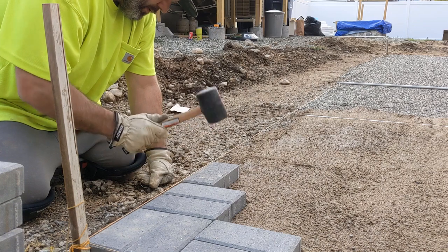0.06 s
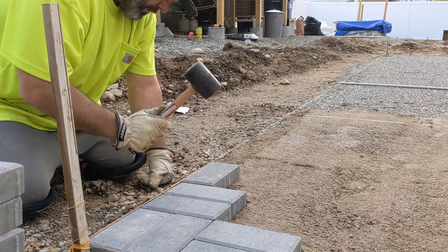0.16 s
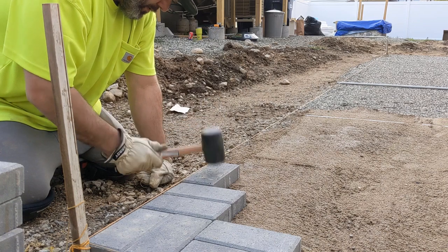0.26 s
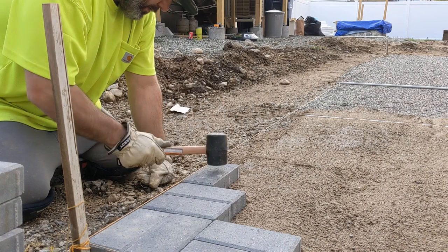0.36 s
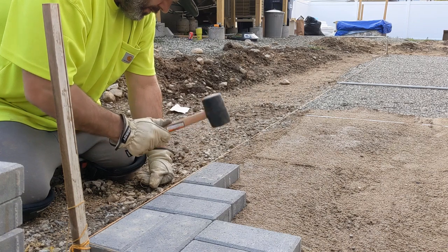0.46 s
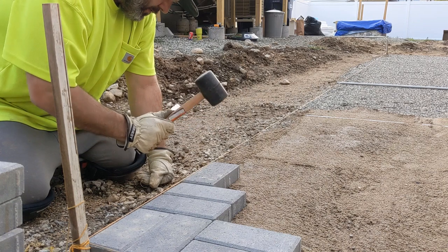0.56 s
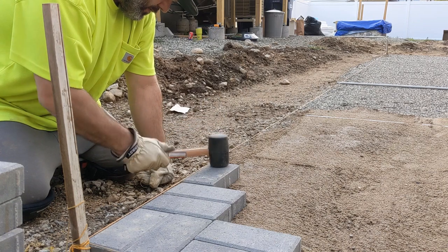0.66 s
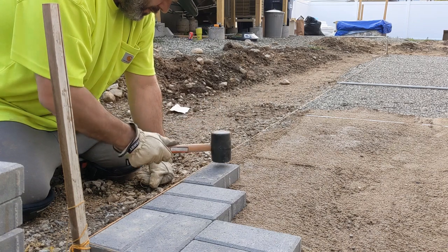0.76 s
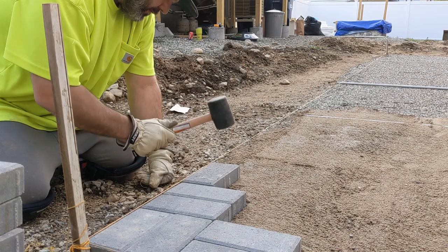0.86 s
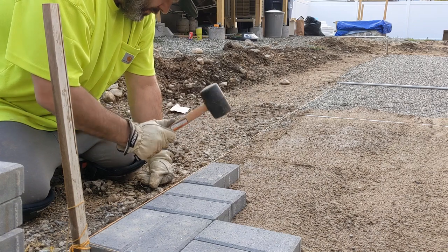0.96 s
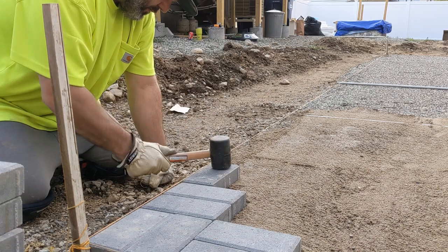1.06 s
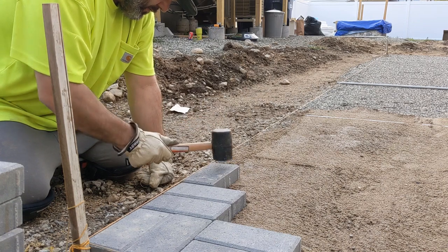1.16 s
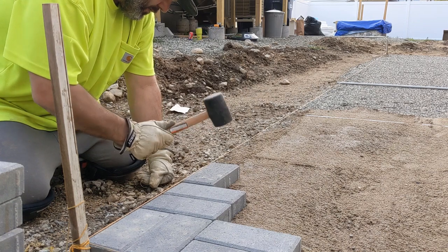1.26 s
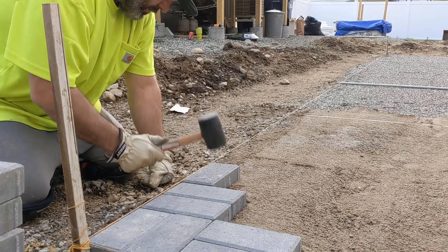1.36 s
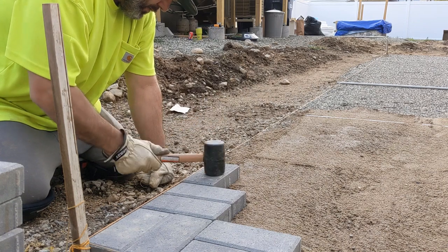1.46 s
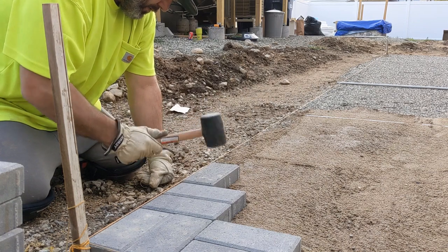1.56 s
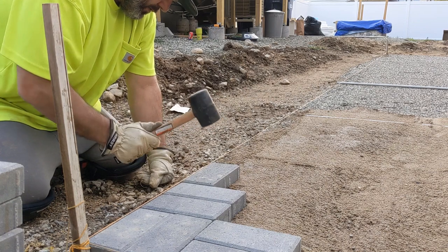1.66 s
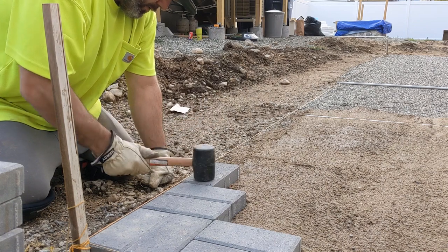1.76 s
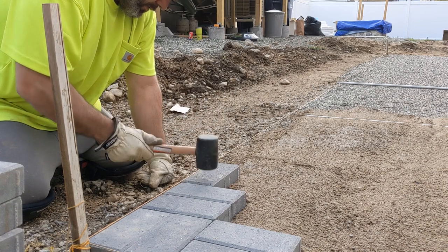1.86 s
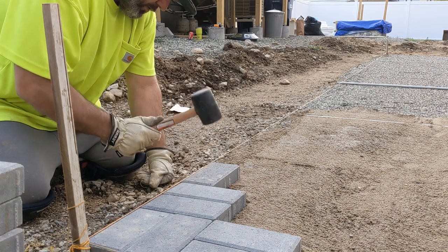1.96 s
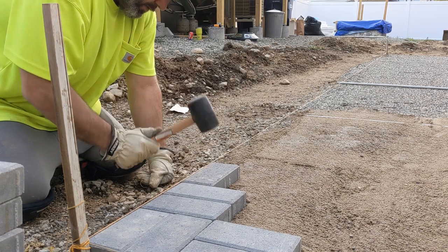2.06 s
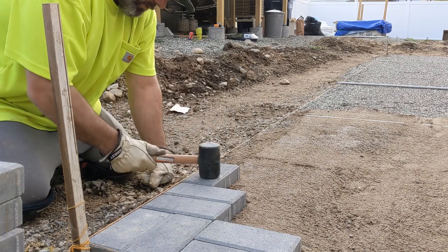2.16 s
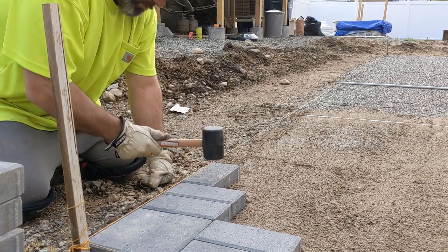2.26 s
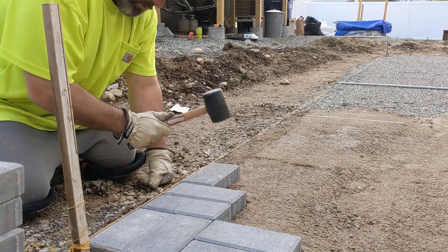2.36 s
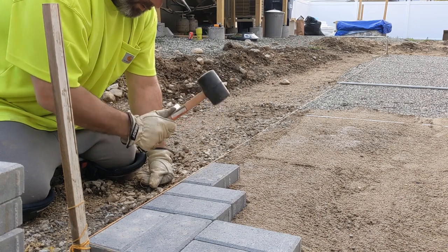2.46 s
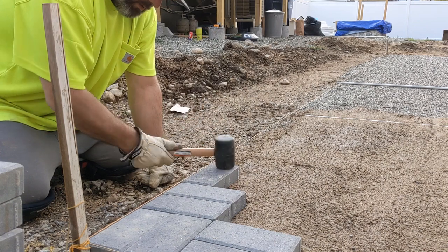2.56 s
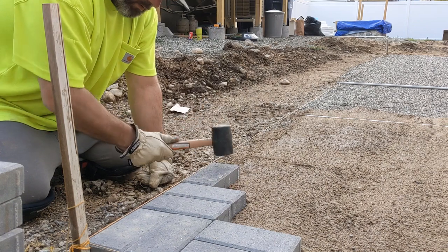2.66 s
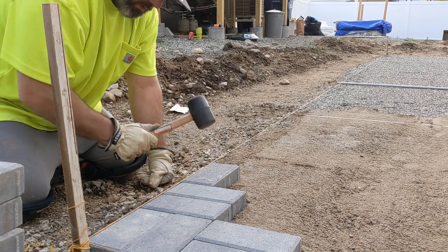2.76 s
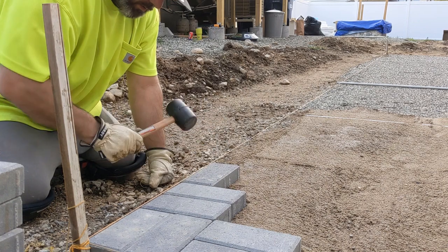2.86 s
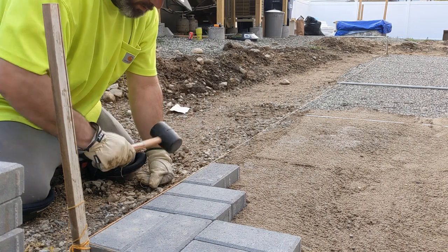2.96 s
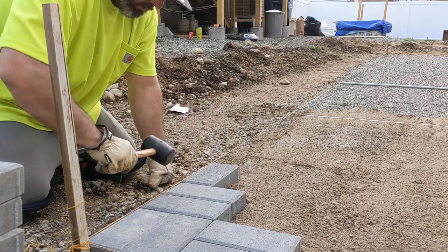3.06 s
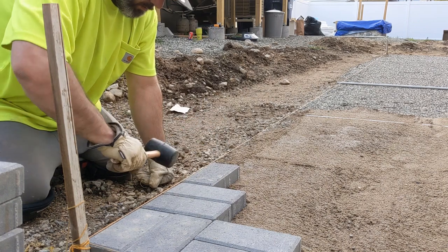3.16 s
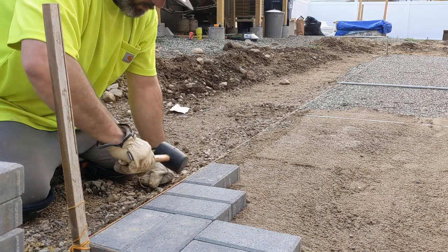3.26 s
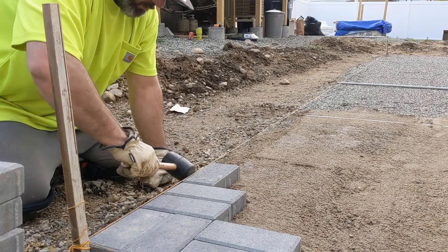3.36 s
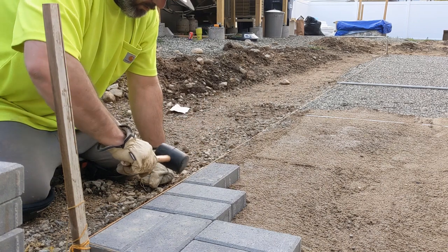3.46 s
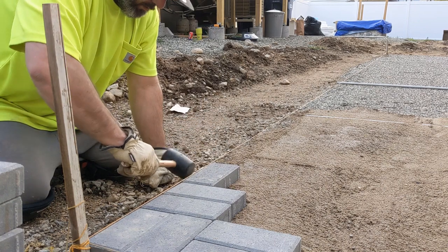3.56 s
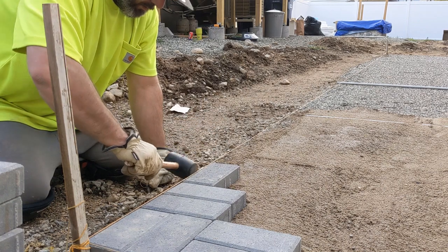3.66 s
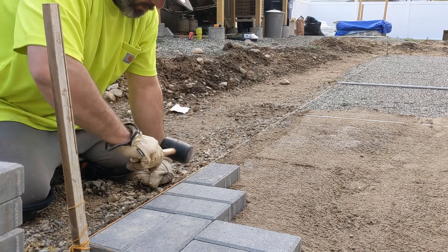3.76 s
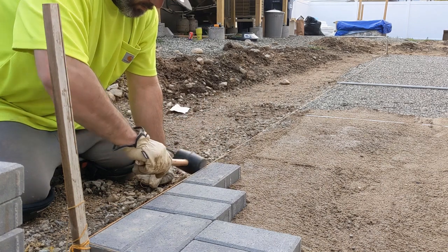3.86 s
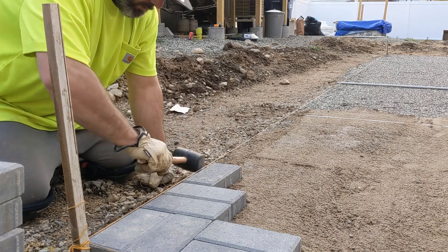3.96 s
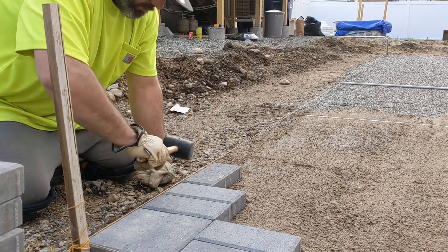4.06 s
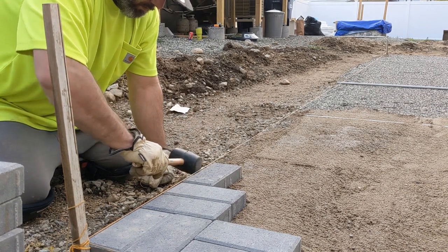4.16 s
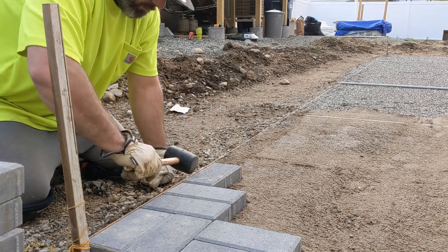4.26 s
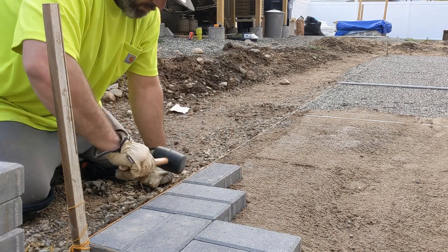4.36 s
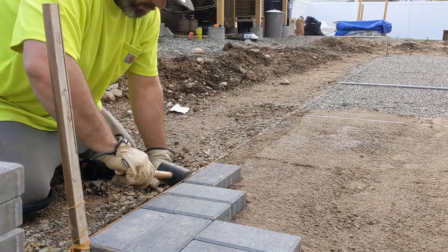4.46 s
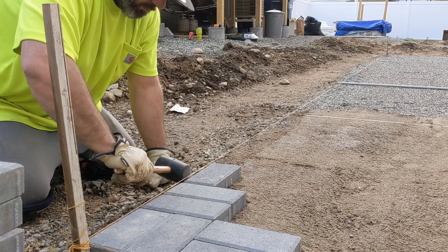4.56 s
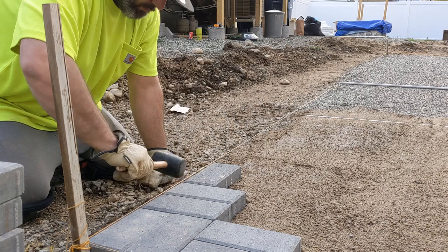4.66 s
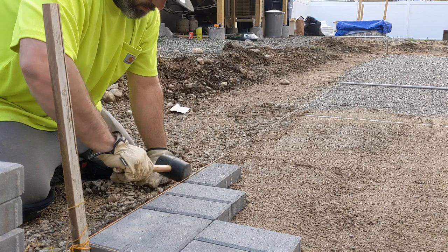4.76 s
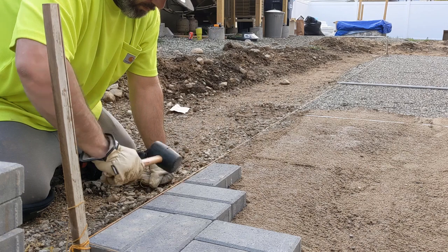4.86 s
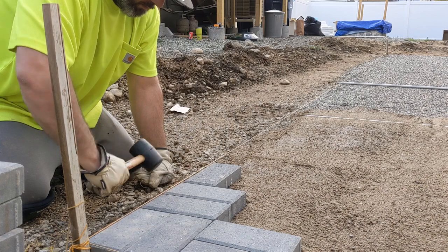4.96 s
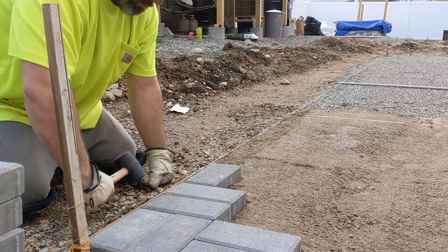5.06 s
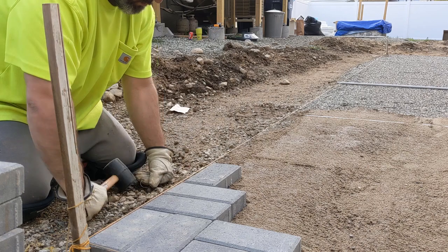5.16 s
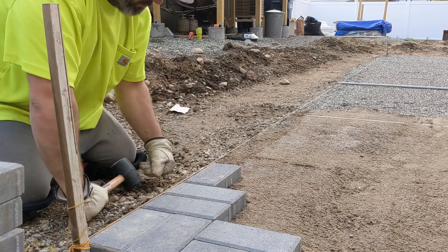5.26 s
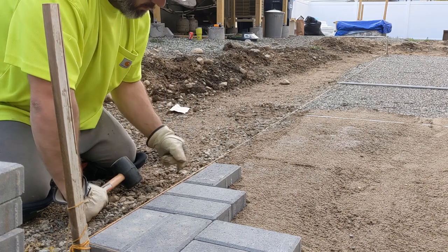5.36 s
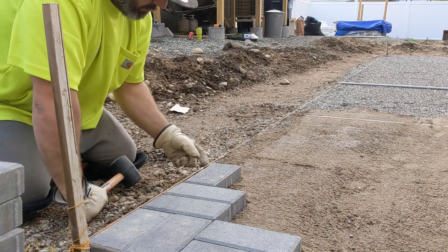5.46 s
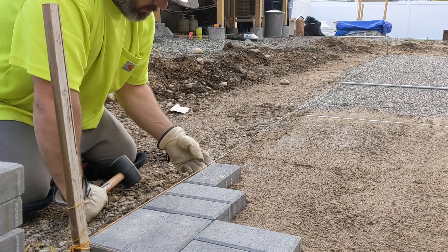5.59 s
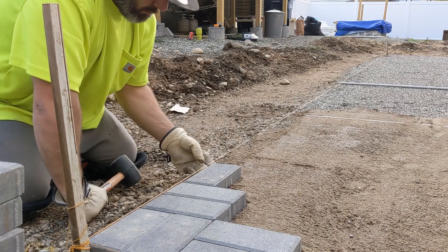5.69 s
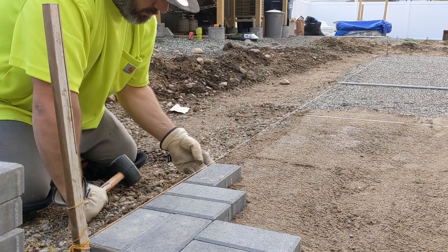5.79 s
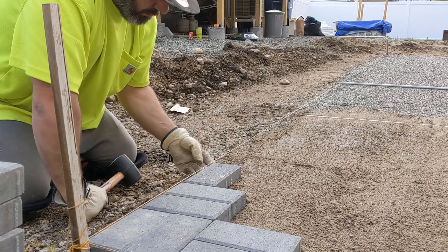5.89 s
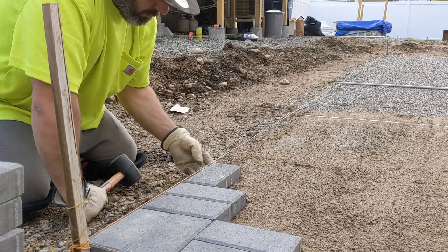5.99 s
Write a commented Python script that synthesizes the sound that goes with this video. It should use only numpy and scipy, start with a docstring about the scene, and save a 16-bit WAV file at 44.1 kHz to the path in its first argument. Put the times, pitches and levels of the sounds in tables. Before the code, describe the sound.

In an outdoor yard, eight firm, evenly paced knocks of a rubber mallet bed a paving slab into sand near the microphone, crunching grit and echoing briefly. The work turns to four quieter edge taps, a loose stone clicks, and the mallet lands on shifting gravel. Far birds call faintly throughout, above a quiet traffic rumble and machinery hum.

```python
"""In a yard, a rubber mallet beds a concrete paver into sand: eight blows on its face, four edge taps.
Each blow cracks on grit, rings the slab, thumps the sand bed and throws up sand; fence and house echo it.
Grit shifts under glove and knee, a loose stone is knocked, and the mallet is laid on gravel.
Birds whistle, chirp and call, most of them far off, over a low rumble of traffic and a machine hum."""
import sys
import numpy as np
from scipy import signal
from scipy.fft import rfft, irfft, next_fast_len
from scipy.io import wavfile

SR = 44100
rng = np.random.default_rng(int(sys.argv[2]) if len(sys.argv) > 2 else 0)


def wav_record(signal):
    """Record a signal, one row per channel, as 16-bit PCM in the file named by sys.argv[1]."""
    frames = np.transpose(np.atleast_2d(signal))
    bounded = np.clip(frames, -1, 1)
    # unit amplitude maps onto the largest positive 16-bit level
    quanta = np.round(bounded * 32767).astype(np.int16)
    wavfile.write(sys.argv[1], SR, quanta)


N = 265923
T = np.arange(N) / SR
SHORT = T[:SR // 4]  # a quarter second, enough for one knock

# Levels in the tables are relative: the functions turn them up or down.
# tone of far traffic and air (frequency [Hz], level [dB])
TRAFFIC_TONE = [(15, -51), (25, -23), (49, -1.5), (137, -10), (195, -8), (229, -10.5), (309, -12),
                (363, -23.5), (463, -18.5), (531, -21.5), (1560, -25.5), (2220, -29.5), (2760, -31.5),
                (9840, -43.5), (16000, -53)]
# how alike left and right are for sound from all sides (frequency [Hz], correlation [-1 to 1])
LIKENESS = [(60, 0.88), (150, 0.93), (350, 0.61), (700, 0.31), (1300, -0.45), (2600, -0.069), (7000, 0.77),
            (15000, 0.58)]
# tones of far machinery (pitch [Hz], level [dB])
HUM_TONES = [(59.2, -63), (199.2, -66.5)]
# blows on the face (time [s], level [dB], brightness [dB], clack on the next paver [dB], grit [dB])
FACE_BLOWS = [(.0078, 0, -6, -1, 0), (0.4277, 1.5, -5.5, -9.5, -3), (.819, -1.5, 4, -6, 2.5),
              (1.1816, .5, 2.5, -10.5, 2), (1.5408, 1.5, -4.5, -6, -3.5), (1.8824, 0, 2.5, 6, 1),
              (2.2585, -0.45, 2.5, 3, 2.5), (2.7134, .5, 4.5, 1.5, -2)]
# A mode is one tone of a struck thing; its fade time (t60) is how long it takes to drop by 60 dB.
# The next four tables list modes (base pitch [Hz], level [dB], fade time [s])
FACE_MODES = [(187.7, -12.5, 0.021), (329, -7.5, 0.03), (487.4, 8.5, 0.0077), (616.7, 0, 0.011),
              (893, -4, .014), (791.3, 10, 0.0044), (1195.4, -3, 0.0062), (606.5, -18.5, 0.035)]  # the slab struck on its face
BED_MODES = [(90.7, 1.4, 0.02843), (109.2, 5.7, .024), (180, 5.1, 0.011)]  # the sand bed under it
CLACK_MODES = [(1600, -19, 0.0065), (1950, -20.5, 0.0021), (2306, -25.5, 0.0046), (3030, -28.5, 0.013)]  # two pavers knocking together
EDGE_MODES = [(363.7, 7, 0.012), (600, 5, 0.0086), (790, -2.5, 0.0061)]  # the slab struck on its edge
# The next four tables give the tone of a noise (frequency [Hz], level [dB])
SLAP_TONE = [(300, -24.5), (1000, -4), (1700, 4.5), (2700, -1.5), (3900, -8.5), (6000, -6.5), (8500, -8),
             (10500, -14.5), (12500, -22.5), (16000, -33.5)]  # rubber on the gritty slab
CRUNCH_TONE = [(300, -21), (1200, -1), (2200, -3.5), (3900, -3), (6200, -2), (9000, -9.5), (12000, -19.5),
               (16000, -19.5)]  # grit being crushed
SAND_TONE = [(500, -25), (2500, -10.5), (4500, -4), (7000, 1), (9500, -8.5), (12000, -18.5), (16000, -19.5)]  # sand pattering down
GRAVEL_TONE = [(100, -9), (400, 1.5), (1000, 4.5), (2300, -2), (3500, -1), (6000, 7), (9000, 0),
               (12000, -6.5), (16000, -19)]  # gravel sliding
# the microphone's two openings (frequency [Hz], right side's lag [microseconds], left minus right [dB])
MIC_PORTS = [(100, 35, 1.5), (1000, 94, 0), (2500, 74, 0), (3988, 68, -1), (5700, 63, 6), (6400, 43, -4.5),
             (7222, 82, -9), (9300, 88, 1.5), (11643, 55, 6.5), (15000, 66, 3.5)]
# echoes off stacks, walls and fence (delay [s], level [dB], band centre [Hz], band width [Hz])
WALL_ECHOES = [(.0096, -11.5, 208.6, 132), (0.0327, -22, 154, 159), (0.0371, -33.5, 387, 620),
               (.048, -12.5, 98, 40.04), (.056, -38, 550, 403), (0.0964, -27, 530, 100),
               (.0985, -50, 5150, 2000), (.1295, -35, 920, 795), (.148, -39.5, 600, 400)]
# sound scattered around the yard (frequency [Hz], level [dB], fade time [s])
YARD_BANDS = [(100, -21.5, 0.41), (248.5, -30.5, 1.6), (550, -35.5, 0.7), (1100, -33.5, 1.2),
              (1700, -36.5, 0.98), (2600, -35.5, 2.2), (5000, -30.5, .7), (10100, -39, 1.6)]
# thin, sinking bird notes (time [s], length [s], starting pitch [Hz], level [dB])
THIN_NOTES = [(0.091, .27, 1865, -68.5), (.67, .15, 1850, -67.5), (2.45, .11, 2835, -66),
              (4.38, .16, 1410, -67), (4.695, 0.24, 1914, -67.5), (4.845, 0.33, 1640, -70.5)]
# short chips of a nearer bird (time [s], level [dB])
BIRD_CHIPS = [(.255, -72.5), (.785, -70), (1.066, -66), (1.361, -67.5), (2.51, -68.5)]
# the songbird's groups of whistles (time [s], level [dB])
SONG_PHRASES = [(.43, -56), (3.8, -54.5)]
# single pieces of grit shifting (time [s], level [dB])
GRIT_TICKS = [(2.986, -61), (3.227, -60), (4.104, -61.5), (4.150, -58), (5.34, -48), (5.421, -49.5),
              (5.494, -50.5), (5.544, -52.5), (5.785, -58.5), (5.811, -57)]
# taps on the edge (time [s], level [dB], pitch [factor], thump [dB], paver's free ring [dB], grit [dB])
EDGE_TAPS = [(3.471, -23, 0.82, 6.5, -38, -1.5), (3.7349, -21.5, 0.95, 4, -31, 1),
             (4.004, -17, 1.08, 5.5, -52, 2), (4.6029, -29, 1.01, 1.5, -27, 4.5)]
# the two voices of one chirp (time [s], top pitch [Hz], level [dB])
CHIRP_VOICES = [(3.785, 6490, -65.5), (3.797, 4065, -59.5)]
# modes of a loose stone (base pitch [Hz], level [dB], fade time [s])
STONE_MODES = [(660, -35.5, 0.012), (1510, -42.5, 0.021), (5000, -63, .07)]
# mallet and hand thudding on the ground (time [s], base pitch [Hz], level [dB])
GROUND_THUDS = [(5.254, 180, -26), (5.812, 162, -40)]


def undb(db):
    """Turn decibels into a number to multiply by."""
    return 10 ** (np.asarray(db) / 20)


def fade(t, t60):
    """A smooth fade that is 60 dB down after t60 seconds."""
    return np.exp(-np.log(1000) * t / max(t60, 1e-4))


def along(table, hz, column=1):
    """Read a table between its rows, with frequency spaced in octaves."""
    table = np.asarray(table, float)
    return np.interp(np.log(hz + 1e-9), np.log(table[:, 0]), table[:, column])


def shape(x, response):
    """Filter x by a function that gives the gain at each frequency."""
    size = next_fast_len(2 * len(x))
    hz = np.arange(size // 2 + 1) * SR / size
    return irfft(rfft(x, size) * response(hz), size)[:len(x)]


def colour(x, table, size=1024):
    """Give x the tone in a table, without smearing any sound ahead of a hit."""
    hz = np.arange(size // 2 + 1) * SR / size
    cepstrum = irfft(np.log(undb(along(table, hz))))
    cepstrum[1:size // 2] *= 2  # fold the filter's early half onto its late half
    cepstrum[size // 2 + 1:] = 0
    return signal.fftconvolve(x, irfft(np.exp(rfft(cepstrum))))[:len(x)]


def add(track, s, x):
    """Mix x into the track, starting at s seconds."""
    i = max(int(round(s * SR)), 0)
    track[i:i + len(x)] += x[:max(len(track) - i, 0)]


def wander(points, size=N):
    """A wobbly line through evenly spaced random points."""
    return np.interp(np.linspace(0, 1, size), np.linspace(0, 1, points), rng.standard_normal(points))


def diffuse(size):
    """Noise from all sides: left and right are most alike in the bass."""
    likeness = lambda hz: np.clip(along(LIKENESS, hz), -.99, .99)
    mid = shape(rng.standard_normal(size), lambda hz: np.sqrt((1 + likeness(hz)) / 2))
    side = shape(rng.standard_normal(size), lambda hz: np.sqrt((1 - likeness(hz)) / 2))
    return np.array([mid + side, mid - side])


def traffic(level_db=-56.5, swell_db=1.35):
    """Far traffic and air make a low rumble that swells slowly."""
    air = np.array([shape(side, lambda hz: undb(along(TRAFFIC_TONE, hz))) for side in diffuse(N)])
    return air / np.std(air) * undb(level_db + swell_db * wander(20))


def machine_hum(gain_db=-2, drift=0.021, throb_db=2.5):
    """Far machinery hums in low tones that wander in pitch and level."""
    out = np.zeros(N)
    for hz, db in HUM_TONES:
        level = np.sqrt(2) * undb(db + gain_db + throb_db * wander(50))
        pitch_hz = hz * (1 + drift * wander(50))
        out += level * np.sin(2 * np.pi * np.cumsum(pitch_hz) / SR)
    return out


def ring(modes, pitch=1):
    """A knock made of fading tones; neighbours swing against each other, so it takes a moment to build."""
    return sum((-1) ** k * undb(db) * np.sin(2 * np.pi * hz * pitch * SHORT) * fade(SHORT, t60)
               for k, (hz, db, t60) in enumerate(modes))


def grains(t, spread_db):
    """Many tiny clicks of uneven size; a wider spread lets single ones stand out."""
    clicks = rng.standard_normal(len(t))
    clicks *= undb(spread_db * np.minimum(rng.exponential(size=len(t)), 5))
    return clicks / np.std(clicks)


def grit(slap_db, crunch_db, sand_db, rebound_s=0.0029, flight_s=0.042, scatter=0.42):
    """Rubber slaps the slab, crushes grit as it hits and rebounds, and thrown sand patters down."""
    slap = -3.2 * (SHORT == 0) + 0.1 * rng.standard_normal(len(SHORT)) * fade(SHORT, 0.0054)
    rebound = (SHORT > rebound_s) * fade(abs(SHORT - rebound_s), 0.004)
    crush = 0.086 * fade(SHORT, 0.031) + 0.023 * rebound
    sandfall = np.exp(-.5 * (np.log((SHORT + 1e-6) / flight_s) / scatter) ** 2)
    return (undb(slap_db) * colour(slap, SLAP_TONE)
            + undb(crunch_db) * colour(crush * grains(SHORT, spread_db=1.5), CRUNCH_TONE)
            + undb(sand_db) * colour(sandfall * grains(SHORT, spread_db=5.5), SAND_TONE))


def face_blows(pitch=.97, bed_db=-12, clack_after_s=.002):
    """Each blow rings the slab, thumps the sand bed and jolts the slab against its neighbour."""
    out = np.zeros(N)
    thump = undb(bed_db) * ring(BED_MODES, pitch)
    upper_share = lambda hz: along([(600, 0.024), (1100, 0.99)], hz)
    for s, db, bright_db, clack_db, grit_db in FACE_BLOWS:
        # a square hit is shorter, so it rings the higher tones more
        slab = shape(ring(FACE_MODES, pitch), lambda hz: undb(bright_db * upper_share(hz)))
        crack = grit(slap_db=grit_db - 1.63, crunch_db=grit_db + 2.66, sand_db=-50.4)
        add(out, s, undb(db) * (slab - thump + crack))
        add(out, s + clack_after_s, undb(db + clack_db) * ring(CLACK_MODES, pitch))
    return out


def microphone(x):
    """A near sound reaches the right opening later, and the casing changes each side's tone."""
    tilt = lambda hz: undb(along(MIC_PORTS, hz, column=2) / 2)
    lag = lambda hz: np.exp(-2j * np.pi * hz * along(MIC_PORTS, hz) / 10 ** 6)
    return np.array([shape(x, tilt), shape(x, lambda hz: lag(hz) / tilt(hz))])


def echo(hz, delay_s, db, centre_hz, width_hz):
    """The filter for one echo: a band of the sound comes back late."""
    band = 1j * hz * width_hz / (centre_hz ** 2 - hz ** 2 + 1j * hz * width_hz)
    return undb(db) * np.exp(-2j * np.pi * hz * delay_s) * band


def stack_echo(x, left_s=0.002998, right_s=0.00354):
    """A stack of pavers on the left bounces the knock back, to the left side first."""
    return np.array([shape(x, lambda hz: echo(hz, s, db=-4, centre_hz=1020, width_hz=300))
                     for s in (left_s, right_s)])


def wall_echoes(x):
    """Nearby stacks, walls and fence boards each send back a band of the knock."""
    return shape(x, lambda hz: sum(echo(hz, *row) for row in WALL_ECHOES))


def yard_reverb(x, build_s=0.031):
    """Sound scattered around the yard builds up, then each band dies away at its own rate."""
    t, noise, tail = T[:SR], diffuse(SR), 0
    for k, (_, db, t60) in enumerate(YARD_BANDS):
        this_band = [(row[0], float(j == k)) for j, row in enumerate(YARD_BANDS)]
        band_noise = np.array([shape(side, lambda hz: along(this_band, hz)) for side in noise])
        tail = tail + undb(db) * fade(t, t60) * band_noise
    return signal.fftconvolve(x[None], 0.055 * tail * np.minimum(t / build_s, 1), axes=1)[:, :N]


def whistle(hz, rasp):
    """A bird note swells and fades along a pitch line; a quick flutter of pitch makes it raspy."""
    swell = np.sin(np.pi * np.linspace(0, 1, len(hz)))
    fluttering_hz = hz * (1 + .097 * rasp * wander(40, len(hz)))
    return swell * np.sin(2 * np.pi * np.cumsum(fluttering_hz) / SR)


def thin_notes(sink_per_s=.14):
    """Far birds whistle thin notes that slowly sink in pitch."""
    out = np.zeros(N)
    for s, length_s, hz, db in THIN_NOTES:
        sinking_hz = hz * (1 - sink_per_s * T[:int(length_s * SR)])
        add(out, s, undb(db) * whistle(sinking_hz, rasp=.17))
    return out


def foliage(x, t60=0.2193):
    """Leaves and branches smear a far sound, differently on the left and right."""
    scatter = diffuse(len(SHORT)) * fade(SHORT, t60)
    scatter /= np.sqrt(np.sum(scatter ** 2) / 2)
    return signal.fftconvolve(x[None], scatter, axes=1)[:, :N]


def bird_chips(length_s=.034, from_hz=4480, to_hz=3840):
    """A nearer bird, out in the open, gives short falling chips."""
    out = np.zeros(N)
    falling_hz = np.geomspace(from_hz, to_hz, int(length_s * SR))
    for s, db in BIRD_CHIPS:
        add(out, s, undb(db) * whistle(falling_hz, rasp=.12))
    return out


def songbird(repeats=3, every_s=.316, length_s=.2, from_hz=2350, to_hz=2618, soft_db=-7):
    """Each whistle starts low and soft, slides upward and holds its loud top note."""
    out = np.zeros(N)
    turn_s, glide_s = .085, 0.018
    risen = (1 + np.tanh((T[:int(length_s * SR)] - turn_s) / glide_s)) / 2
    hz = from_hz + (to_hz - from_hz) * risen
    for s, db in SONG_PHRASES:
        for k in range(repeats):
            add(out, s + k * every_s, undb(db + soft_db * (1 - risen)) * whistle(hz, rasp=.14))
    return out


def scuff(db, rise_s, t60, spread_db=4.5):
    """A slide of grit that swells and dies away."""
    t = T[:SR]
    swell = np.minimum(t / rise_s, 1) * fade(np.maximum(t - rise_s, 0), t60)
    return undb(db) * swell * grains(t, spread_db)


def gravel(brush_s=4.574, landing_s=5.2523, dig_after_s=0.017):
    """Grit ticks under glove and knee; the mallet brushes the ground, later lands, digs in and slides."""
    out = np.zeros(N)
    for s, db in GRIT_TICKS:
        add(out, s, scuff(db, rise_s=.002, t60=0.026))
    landing = scuff(db=-32.5, rise_s=0.0014, t60=0.048)
    dig = scuff(db=-42, rise_s=0.0014, t60=0.082)
    slide = scuff(db=-55.5, rise_s=0.075, t60=1, spread_db=6.5)
    add(out, brush_s, scuff(db=-58, rise_s=0.028, t60=0.17))
    add(out, landing_s, landing)
    add(out, landing_s + dig_after_s, dig + slide)
    return colour(out, GRAVEL_TONE)


def edge_taps(ring_hz=3045, ring_t60=0.093):
    """Light taps on the edge mostly shove the slab through the sand, leaving a faint high ring."""
    out = np.zeros(N)
    for s, db, pitch, thump_db, ring_db, grit_db in EDGE_TAPS:
        slab = ring(EDGE_MODES, pitch) + ring([(ring_hz, ring_db, ring_t60)])
        thump = undb(thump_db) * ring(BED_MODES, pitch)
        crack = grit(slap_db=grit_db - 8.5, crunch_db=grit_db - 2.5, sand_db=-38)
        add(out, s, undb(db) * (slab - thump + crack))
    return out


def arch(top_hz, depth, length_s):
    """A pitch line that rises to its top and falls again."""
    return top_hz * (1 - depth * np.linspace(-1, 1, int(length_s * SR)) ** 2)


def bird_chirp():
    """One quick chirp in two voices, each rising and falling."""
    out = np.zeros(N)
    for s, hz, db in CHIRP_VOICES:
        add(out, s, undb(db) * whistle(arch(hz, depth=.2, length_s=.07), rasp=0.19))
    return out


def ground_knocks(stone_s=4.6265, thud_t60=0.015):
    """A loose stone is knocked once, then mallet and hand thud dully on the ground."""
    out = np.zeros(N)
    add(out, stone_s, ring(STONE_MODES, pitch=0.98))
    for s, hz, db in GROUND_THUDS:
        add(out, s, ring([(hz, db, thud_t60)], pitch=0.88))
    return out


def low_call(start_s=5.28, gain_db=-53):
    """A low, drawn-out bird call that fades as it goes."""
    out = np.zeros(N)
    call = whistle(arch(top_hz=940, depth=.05, length_s=0.27), rasp=.4)
    add(out, start_s, undb(gain_db) * call * fade(T[:len(call)], t60=1.44))
    return out


def scene(bird_reverb_db=21.5, bird_direct_db=-6):
    """The work is heard directly and by its echoes; far birds come mostly by way of trees and yard."""
    work = face_blows() + edge_taps() + gravel() + ground_knocks()
    song = songbird() + thin_notes() + bird_chirp() + low_call()
    birds = undb(bird_direct_db) * song + foliage(song) + bird_chips()
    background = traffic() + machine_hum()
    near = microphone(work + wall_echoes(work)) + stack_echo(work)
    return near + yard_reverb(work + undb(bird_reverb_db) * song) + birds + background


def record(dry, ceiling=0.85, low_cut_hz=52, high_cut_hz=16100):
    """Drop the deepest bass, round off the tallest peaks and cut the highest treble."""
    lean = signal.sosfilt(signal.butter(4, low_cut_hz, "high", fs=SR, output="sos"), dry)
    rounded = lean / (1 + (lean / ceiling) ** 8) ** (1 / 8)
    return signal.sosfilt(signal.ellip(8, .2, 70, high_cut_hz, fs=SR, output="sos"), rounded)


dry = scene()
out = record(dry)
wav_record(out)
```